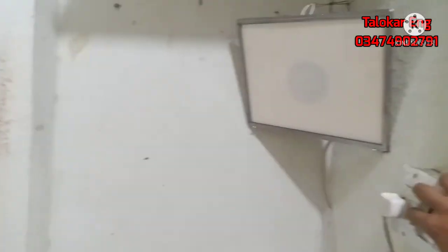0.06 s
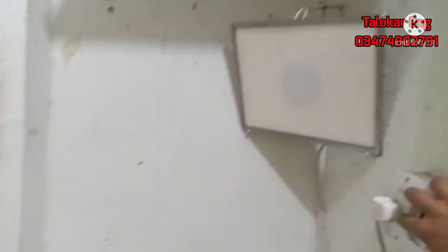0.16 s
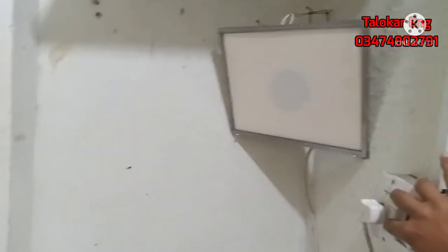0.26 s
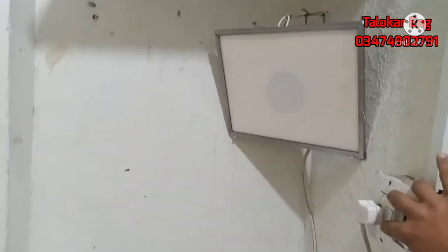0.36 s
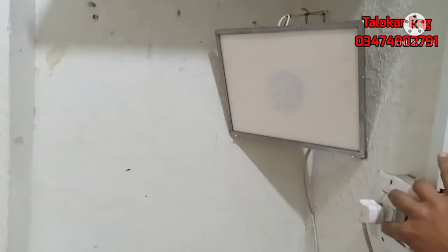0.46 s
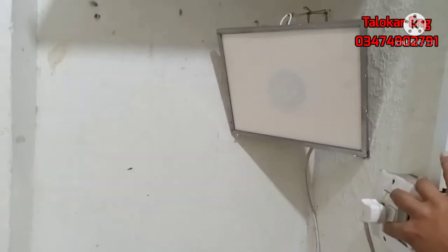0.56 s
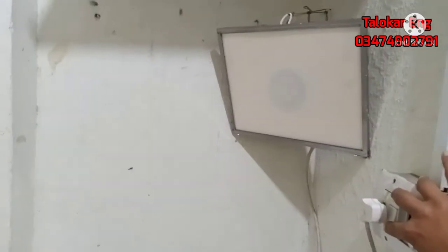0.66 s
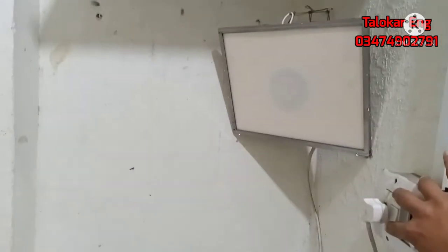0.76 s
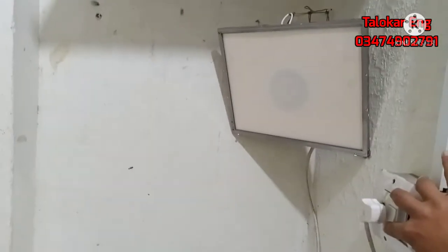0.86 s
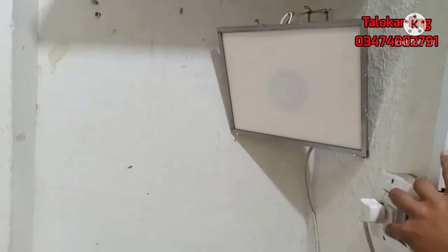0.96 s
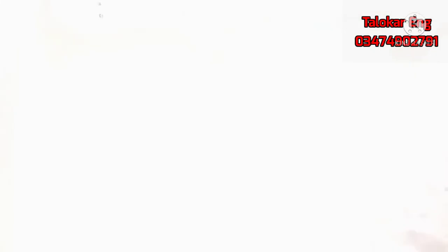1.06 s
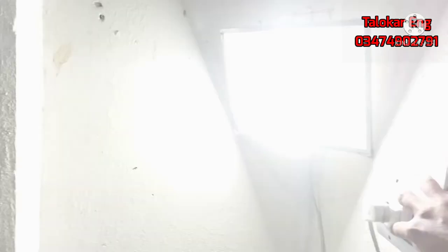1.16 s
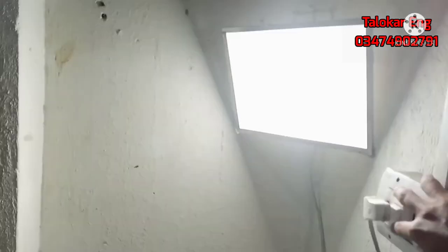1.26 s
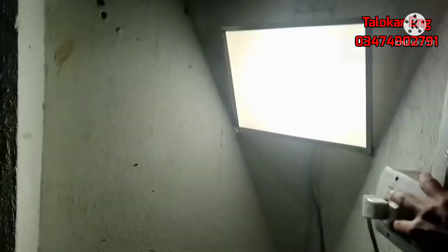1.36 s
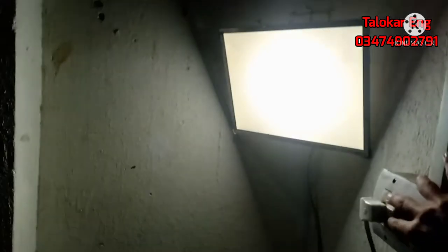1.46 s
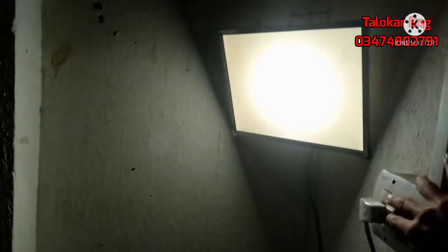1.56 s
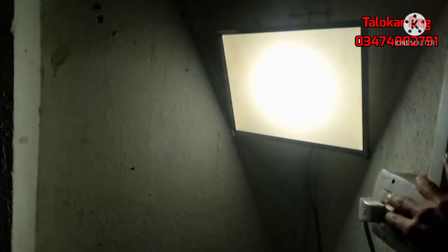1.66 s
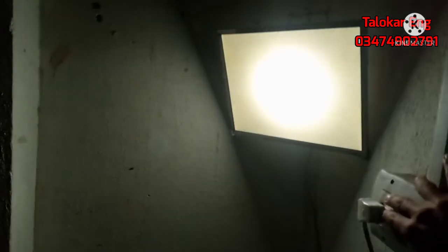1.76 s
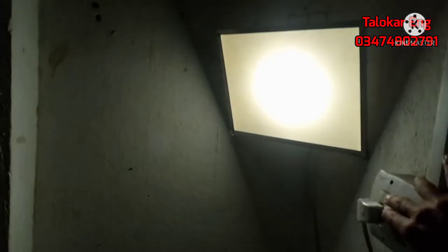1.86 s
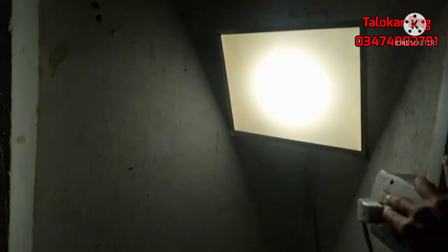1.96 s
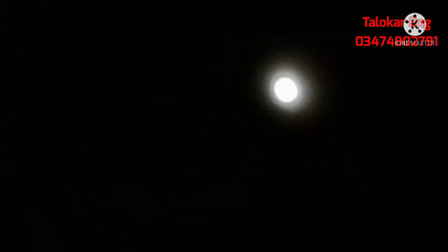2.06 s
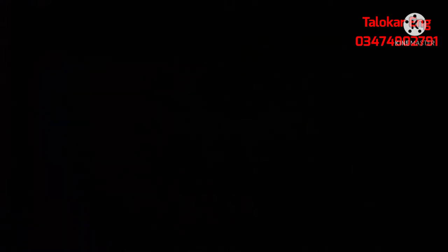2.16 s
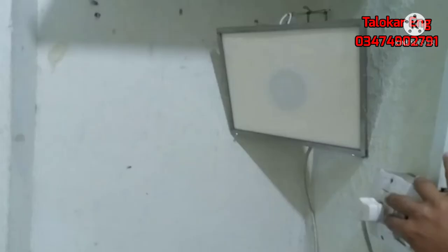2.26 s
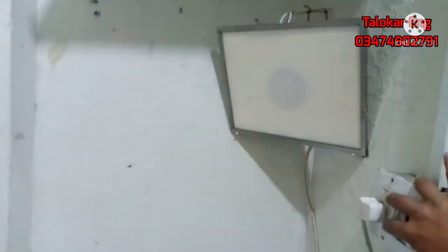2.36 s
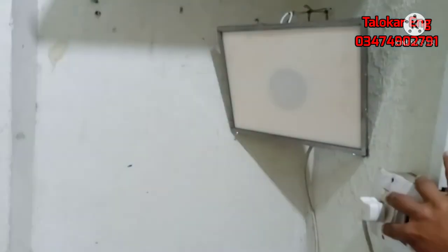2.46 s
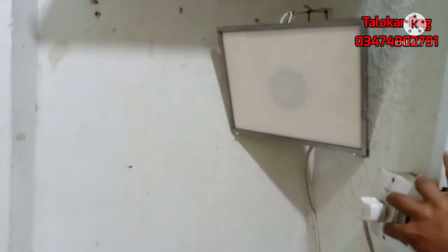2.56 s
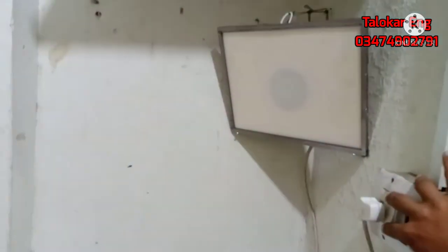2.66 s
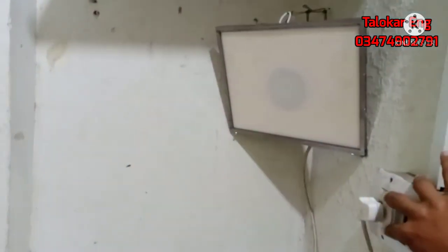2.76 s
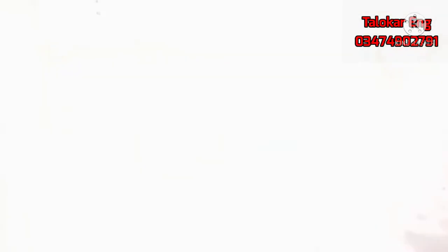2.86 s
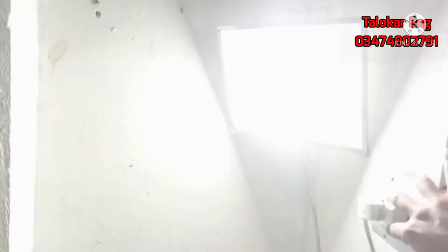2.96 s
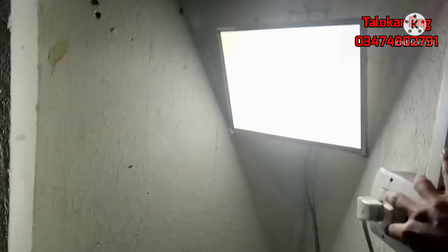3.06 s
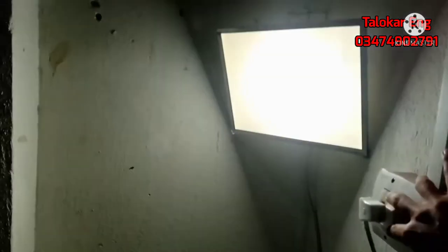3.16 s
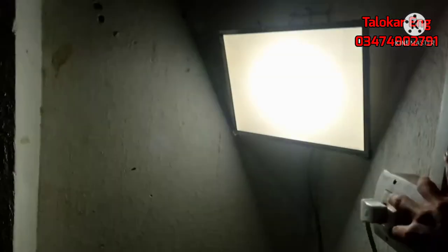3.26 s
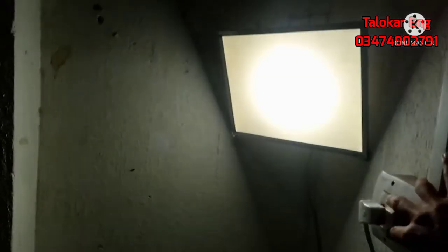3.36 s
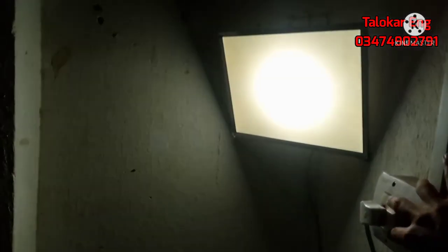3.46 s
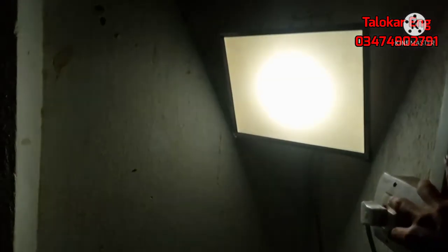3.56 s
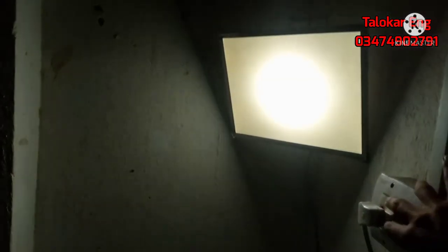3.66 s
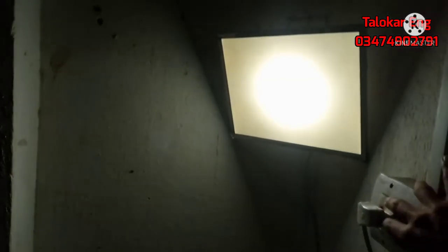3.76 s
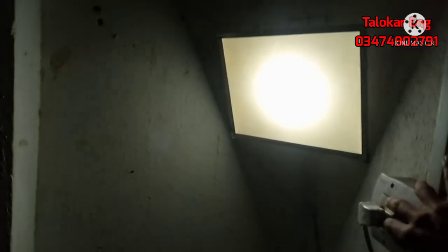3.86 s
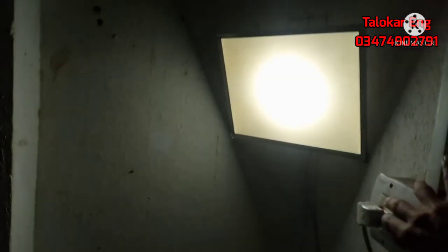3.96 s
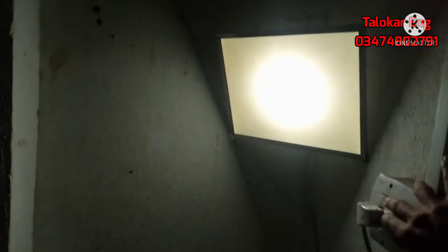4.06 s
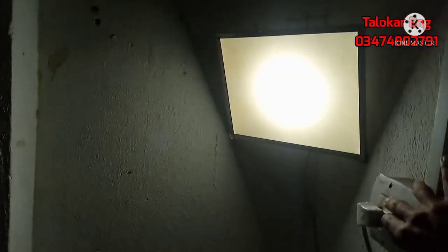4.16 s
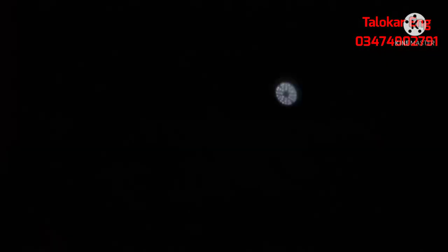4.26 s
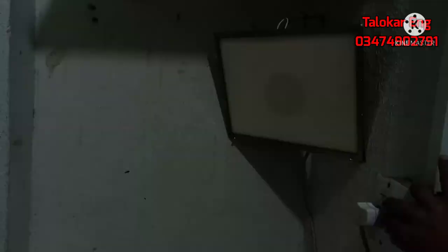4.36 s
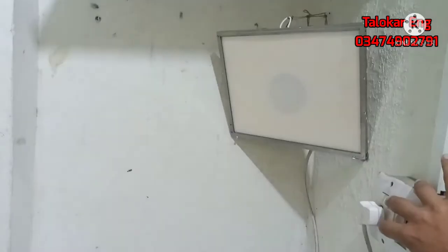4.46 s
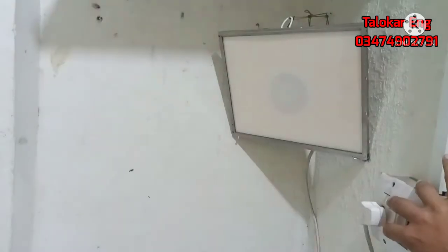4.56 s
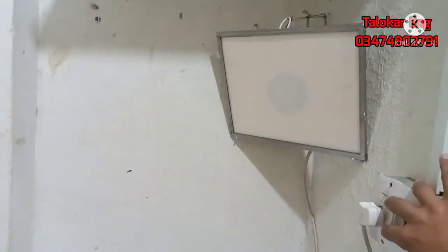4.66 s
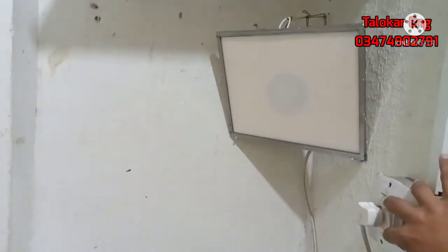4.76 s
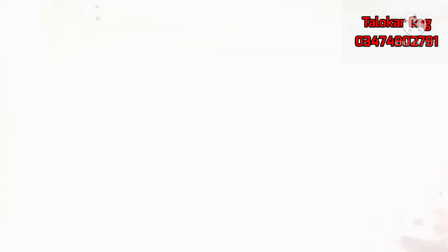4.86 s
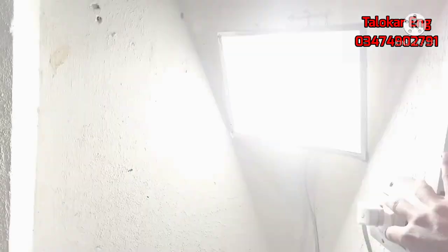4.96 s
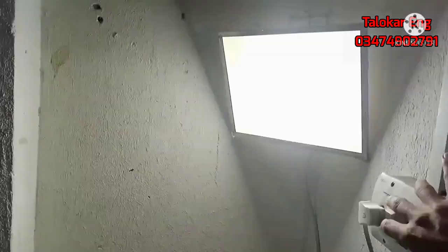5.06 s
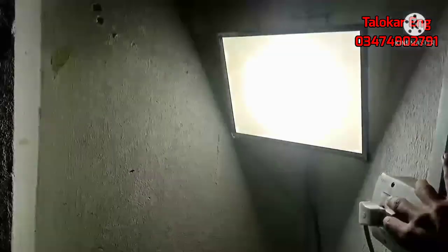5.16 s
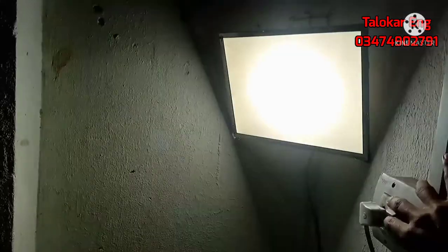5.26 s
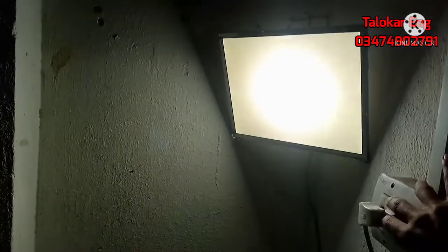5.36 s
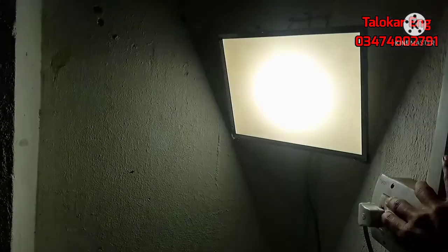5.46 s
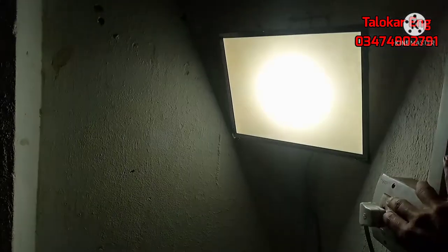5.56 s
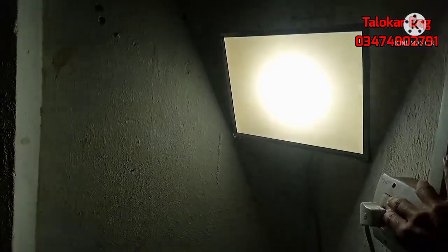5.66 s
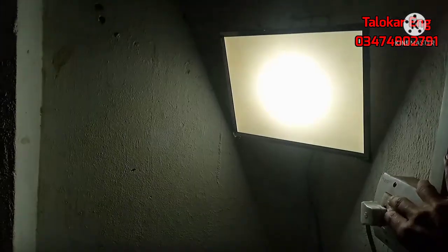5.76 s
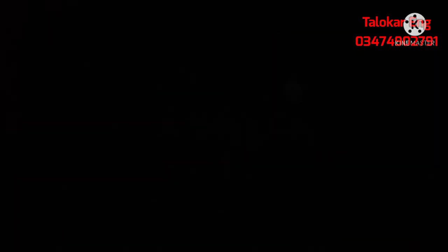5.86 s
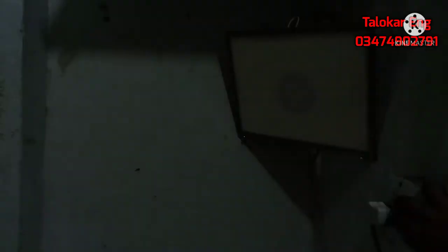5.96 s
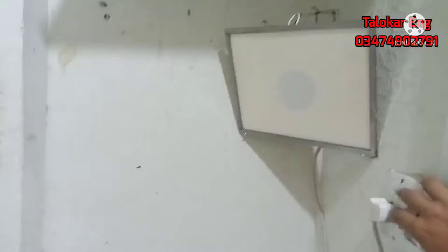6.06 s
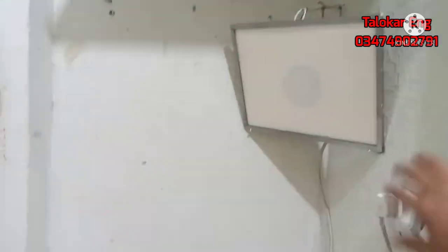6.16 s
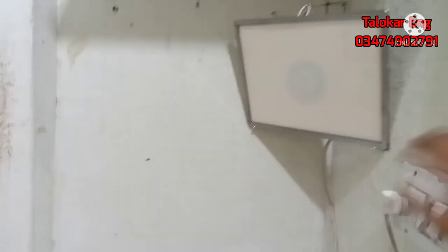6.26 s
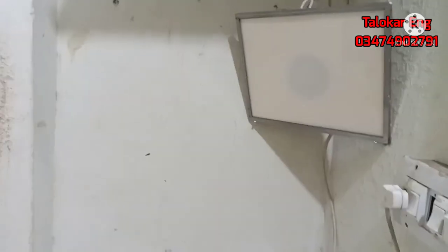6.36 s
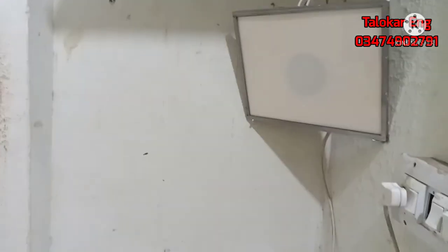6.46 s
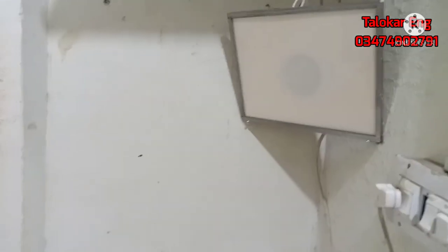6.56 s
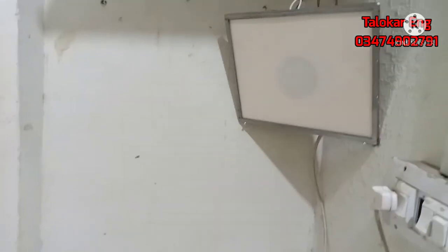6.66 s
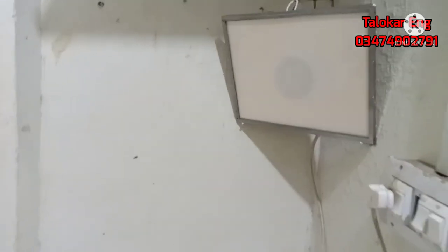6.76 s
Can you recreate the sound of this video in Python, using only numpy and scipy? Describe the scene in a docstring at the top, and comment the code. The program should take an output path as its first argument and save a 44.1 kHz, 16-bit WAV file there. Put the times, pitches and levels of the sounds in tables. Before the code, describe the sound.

Faint finger touches on a switch plate come first, then six crisp loud snaps, unevenly spaced in on-off pairs, each with tiny fast bounces and a short hard-walled echo. Light knocks fall between some of them. After the last snap, the hand leaves with a knock, skin scrape, brief squeak and soft cloth rustle. A phone microphone, close up, catches quiet room rumble, weak wavering hum and slight hiss.

```python
"""Wall switch, close, in a small bare room

A phone close to a plastic wall switch hears it flipped on and off three times, each flip ringing round the walls.
A flip is a shaped pulse with two bounces through narrow ringing peaks; the phone's limiter ducks and recovers.
Filtered pulses knock and tick on the plate; shaped noise makes sliding skin, a squeak and a rustling sleeve.
Narrow bands of noise give a low wavering hum and faint far tones, over quiet rumble and hiss."""
import sys
import numpy as np
from scipy import signal
from scipy.fft import rfft, irfft, next_fast_len
from scipy.io import wavfile
from scipy.ndimage import uniform_filter1d, minimum_filter1d, map_coordinates

SR = 44100
rng = np.random.default_rng(int(sys.argv[2]) if len(sys.argv) > 2 else 0)


def log_audio(samples):
    """Write samples as a 16-bit WAV file to the path given in sys.argv[1]."""
    # one column per channel
    frames = np.atleast_2d(samples).T
    # limit to full scale, then quantise
    limited = np.clip(frames, -1, 1)
    pcm = np.round(limited * 32767).astype(np.int16)
    wavfile.write(sys.argv[1], SR, pcm)


N = 299439

# flips of the rocker, on and off in turn, each with a resonance that the grip leaves free:
# (time [s], relative strength [dB], resonance [Hz], resonance level [dB])
ROCKER_FLIPS = [(1.1098, -8.5, 1733, -3), (2.1787, -6.5, 4495, -3), (2.9146, -8.5, 2020, -2.5),
                (4.3273, -6.5, 1210, 4), (4.9108, -8.5, 3590, -5), (5.9338, -7.5, 870, 2.5)]
# spectrum of the spring's blow against each end stop: (frequency [Hz], relative level [dB])
ON_BLOW_SPECTRUM = [(100, -45), (300, -23), (550, -7.5), (800, -6), (1200, -6.5), (1700, 0.5), (2700, -2.5),
                    (3600, 1.5), (5000, -2), (6500, -9.5), (9000, -5.5), (10200, -20.5), (13000, -21.5),
                    (15500, -19)]
OFF_BLOW_SPECTRUM = [(100, -46), (300, -30.5), (550, -4), (800, -7), (1300, -9.5), (2000, -2), (2900, 0),
                     (4800, -2), (5800, 0.5), (6800, -4), (9000, -3.5), (11000, -12), (13000, -15),
                     (15500, -6.5)]
# narrow ringing peaks that the room gives the on and off clicks, before they are widened:
# (frequency [Hz], width [Hz], relative level [dB])
ON_RING_PEAKS = [(1090, 24, -11.5), (1420, 19, -6.5), (1583, 56, -2.5), (2070, 130, -5), (2714, 95, -5.5),
                 (3437, 110, -1), (3890, 70, -5), (4290, 37, -9), (4660, 63, -9.5), (5227, 220, -9.5),
                 (5650, 37, -10.5), (6250, 140, -2.5), (6300, 15, -11), (8780, 47, -34.5)]
OFF_RING_PEAKS = [(883, 100, -3.5), (1340, 25, 0), (1560, 240, -0.5), (2170, 110, -11.5), (3410, 81, -6),
                  (4200, 19, -10.5), (4387, 76, -4.5), (5050, 11, 2.5), (5340, 130, 0), (5900, 620, -5.5),
                  (6430, 64, -10.5), (6740, 24, -8), (7700, 32, -12.5), (8950, 75, -10.5)]
# contact at each end stop: (time between bounces [s], bounce level [dB], widening of the peaks [Hz])
ON_STOP, OFF_STOP = (0.00115, -2.5, 8), (0.0011, -2, 16)

# fingers pressing and leaving the plate:
# (time [s], level [dB], thud of the board relative to the plate [dB])
FINGER_KNOCKS = [(0.125, -44.5, -21), (1.551, -39.5, -20), (1.633, -46, -7), (2.383, -34, -21),
                 (5.84, -43.5, -17.5), (6.219, -33, -15), (6.232, -24.5, -6)]
# lower resonances of the switch board: (frequency [Hz], width [Hz], relative level [dB])
BOARD_MODES = [(130, 45, -6), (257, 59, 4), (466, 170, 4.5), (867, 160, 15)]
# the plate's ring under a finger
KNOCK_HZ, KNOCK_WIDTH_HZ = 1286, 446
# ticks of a nail on plastic: (time [s], relative level [dB])
NAIL_TICKS = [(0.212, -43), (0.319, -45), (0.417, -45), (0.645, -48), (1.038, -45), (2.384, -39),
              (6.22, -30)]
# spectrum of a nail's tick: (frequency [Hz], relative level [dB])
NAIL_SPECTRUM = [(500, -29.5), (2000, -1.5), (4500, -6), (6800, 12), (9000, -4.5), (12000, -4.5),
                 (15500, -8)]

# fingers sliding on the plate: (start [s], length before release [s], level [dB])
FINGER_SLIDES = [(0.074, 0.14, -72.5), (0.207, 0.2, -69.5), (6.151, 0.17, -62), (6.34, 0.1, -57.5)]
SLIDE_ATTACK_S, SLIDE_RELEASE_S = 0.004, 0.028
# spectrum of skin sliding on the plate: (frequency [Hz], relative level [dB])
SKIN_SPECTRUM = [(400, -10), (1000, -19), (2800, -3), (4500, 0), (6800, 7.5), (8500, 3), (11000, -8),
                 (15500, -12)]
# one squeak of a fingertip slipping off the rocker: (start [s], mean frequency [Hz], level [dB])
FINGERTIP_SQUEAK = (6.186, 985, -47)

# the arm reaching in and withdrawing: (time at full speed [s], length [s], rustle level [dB])
ARM_SWEEPS = [(0.01, 0.17, -60.5), (6.539, 0.62, -49.5)]
# spectrum of a rustling sleeve: (frequency [Hz], relative level [dB])
CLOTH_SPECTRUM = [(50, -12), (110, 11), (200, 2), (300, 9), (400, 7), (700, -5.5), (1100, 5), (1600, 6.5),
                  (3000, 4.5), (5000, 5.5), (7000, 8.5), (9000, 2), (12000, -9.5), (15500, -9)]

# faint thin tones from far off: (time at the middle [s], frequency [Hz], level [dB])
FAR_TONES = [(3.73, 1430, -75), (3.87, 3590, -79), (3.95, 2330, -75)]
TONE_S, TONE_WIDTH_HZ = 0.18, 114
# bands of the hum: (frequency [Hz], width [Hz], level [dB])
HUM_BANDS = [(65.6, 7, -62.5), (112.53, 15, -58.5), (202.4, 33, -65.5)]
# spectrum of the quiet room's rumble and hiss: (frequency [Hz], relative level [dB])
AIR_SPECTRUM = [(20, -21), (45, -16), (60, -0.5), (90, -2), (150, -5), (220, -14), (280, -17.5),
                (400, -24.5), (800, -30), (2000, -36), (5000, -41), (15500, -46.5)]

# reverberation of the small bare room: (frequency [Hz], time to fall 60 dB [s])
ROOM_DECAY = [(150, 0.6), (500, 0.38), (1000, 0.28), (2000, 0.35), (4000, 0.31), (6500, 0.29), (9000, 0.25),
              (12000, 0.26), (15500, 0.16)]
# the phone's microphone, a treble shelf and a port resonance: (frequency [Hz], level [dB])
MIC_RESPONSE = [(6900, -0.5), (7700, -8), (13600, -12.5), (14400, -2), (15100, 3.5), (15600, -8.5)]
TOP_HZ = 15750  # nothing passes above this


def switch(room, level_db=19, ring_db=7, grip_width_hz=160, wet_db=0.07, bounce_feed=0.45):
    """The spring throws the rocker at each stop in turn; it bounces twice and the click rings in the room."""
    out = np.zeros(N)
    positions = [
        (ON_BLOW_SPECTRUM, ON_RING_PEAKS, ON_STOP),
        (OFF_BLOW_SPECTRUM, OFF_RING_PEAKS, OFF_STOP),
    ]
    for flip, (s, db, grip_hz, grip_db) in enumerate(ROCKER_FLIPS):
        blow, peaks, (bounce_s, bounce_db, widening_hz) = positions[flip % 2]
        grip_mode = [(grip_hz, grip_width_hz, grip_db)]

        def ring_and_grip(f):
            ring = 1 + amp(ring_db) * resonances(peaks, f, widening_hz)
            return ring * (1 + resonances(grip_mode, f))

        snap = filtered(impulse(blow), ring_and_grip)
        snap = amp(level_db + db) * snap / np.linalg.norm(snap)
        bounces = np.zeros(len(snap))
        for k in (1, 2):
            add(bounces, k * bounce_s, amp(bounce_db) * scuffed(snap, size=32))
        add(out, s, snap + bounces)
        # the echoes follow mostly the first blow, with the bounces fainter, so the tail stays smooth
        add(out, s, amp(wet_db) * echoes(snap + bounce_feed * bounces, room))
    return out


def fingers(room, treble_db=-17, knock_wet_db=-3.5, tick_db=1, tick_wet_db=-3):
    """Soft knocks ring the plate and thud in the board behind it; nails add bright ticks."""
    out = np.zeros(N)
    pad = impulse([(100, -26), (350, 7.5), (1400, -4), (2500, 0), (5000, 0), (15000, -66)])
    tick = impulse(NAIL_SPECTRUM)
    tick = tick / abs(tick).max()
    for s, db, thud_db in FINGER_KNOCKS:

        def plate_and_board(f):
            plate = resonances([(KNOCK_HZ, KNOCK_WIDTH_HZ, 2)], f) ** 2
            return plate + amp(thud_db) * resonances(BOARD_MODES, f)

        knock = filtered(pad, plate_and_board)
        knock = knock / abs(knock).max()
        add(knock, 0, amp(treble_db) * scuffed(tick, size=128))
        add(out, s, amp(db) * knock)
        add(out, s, amp(db + knock_wet_db) * echoes(knock, room))
    for s, db in NAIL_TICKS:
        add(out, s, amp(db + tick_db) * scuffed(tick, size=40))
        add(out, s, amp(db + tick_db + tick_wet_db) * echoes(tick, room))
    return out


def skin(catch_rate=80, catch_db=-3, patch_db=2.0):
    """Skin hisses over the plate and catches at random, catch_rate times a second on average."""
    pressure = sum(amp(db) * stroke(s, length, SLIDE_ATTACK_S, SLIDE_RELEASE_S)
                   for s, length, db in FINGER_SLIDES)
    hiss = patchy(noise(lambda f: amp(along(SKIN_SPECTRUM, f))), patch_db)
    catches = (rng.random(N) < catch_rate / SR) * rng.standard_normal(N)
    # a catch is a tiny, thin nail tick, tilted towards the treble
    thin_tick = np.diff(impulse(NAIL_SPECTRUM))
    ticks = unit(signal.fftconvolve(catches, thin_tick)[:N])
    return pressure * (hiss + amp(catch_db) * ticks)


def squeak(length_s=0.012, attack_s=0.0023, release_s=0.016, jitter=0.048, jitter_rate=600, rasp_db=-7):
    """Skin sticks and slips for a moment: an unsteady tone with a bright rasp once a cycle."""
    s, hz, db = FINGERTIP_SQUEAK
    unsteady_hz = hz * (1 + jitter * wobble(jitter_rate))
    phase = 2 * np.pi * np.cumsum(unsteady_hz) / SR
    hiss = noise(lambda f: amp(along(SKIN_SPECTRUM, f)))
    rasp = unit(hiss * (1 + np.cos(phase)) ** 2)
    tone = unit(np.sin(phase))
    return amp(db) * stroke(s, length_s, attack_s, release_s) * (tone + amp(rasp_db) * rasp)


def sleeve(grain_db=1.0, grain_rate=90, patch_db=1.6,
           rumble_db=-3, rumble_hz=112, rumble_width_hz=25, rumble_lead_s=0.14):
    """Cloth rustles in step with the arm's speed; a low rumble runs ahead of it."""
    def speed(lead_s):
        return sum(amp(db) * swell(s - lead_s, length) for s, length, db in ARM_SWEEPS)

    cloth = patchy(noise(lambda f: amp(along(CLOTH_SPECTRUM, f))), patch_db)
    grain = unit(amp(grain_db * wobble(grain_rate)))
    rustle = speed(0) * grain * cloth
    rumble = amp(rumble_db) * speed(rumble_lead_s) * narrow(rumble_hz, rumble_width_hz)
    return rustle + rumble


def thin_tones():
    """Narrow bands of noise from far off, each swelling and fading once."""
    return sum(amp(db) * swell(s, TONE_S) * narrow(hz, TONE_WIDTH_HZ) for s, hz, db in FAR_TONES)


def background(air_db=-58, patch_db=2.0, swell_db=0.5, swell_rate=6):
    """Faint hiss and low rumble, with a hum that wavers in narrow bands."""
    hum = sum(amp(db) * narrow(hz, width) for hz, width, db in HUM_BANDS)
    air = patchy(noise(lambda f: amp(along(AIR_SPECTRUM, f))), patch_db)
    return hum * amp(swell_db * wobble(swell_rate)) + amp(air_db) * air


def reflections(near_db=-1, near_s=0.002, far_db=1, build_s=0.005):
    """Quick dense echoes from the corner round the switch, then the diffuse tail of the room."""
    hz, frame_s, z = signal.stft(rng.standard_normal(SR * 2 // 3), SR, nperseg=256)
    decay_db = -60 * frame_s / along(ROOM_DECAY, hz)[:, None]
    tail = signal.istft(z * amp(decay_db), SR, nperseg=256)[1]
    t = np.arange(len(tail)) / SR
    tail = tail * (1 - np.exp(-(t / build_s) ** 2))
    corner = rng.standard_normal(len(t)) * (t / near_s) * np.exp(-t / near_s)
    return amp(near_db) * corner / np.linalg.norm(corner) + amp(far_db) * tail / np.linalg.norm(tail)


def echoes(sound, room, kept=0.48):
    """The room's answer: part stays the same, part shifts as the hand moves."""
    # kept is a share of the energy
    response = np.sqrt(kept) * room + np.sqrt(1 - kept) * reflections()
    return signal.fftconvolve(sound, response)


def resonances(modes, f, widening_hz=0):
    """Summed response of modes (Hz, width Hz, dB), each widened by extra damping."""
    total = 0
    for centre, width, db in modes:
        loss = 1j * f * (width + widening_hz)
        total = total + amp(db) * loss / (centre * centre - f * f + loss)
    return total


def impulse(spectrum, size=4096):
    """The sharpest causal (minimum-phase) pulse with this spectrum, by folding its cepstrum."""
    hz = np.fft.rfftfreq(size, 1 / SR)
    cepstrum = irfft(np.log(amp(along(spectrum, hz))))
    cepstrum[1:size // 2] *= 2
    cepstrum[size // 2 + 1:] = 0
    return irfft(np.exp(rfft(cepstrum)))


def scuffed(sound, size):
    """A contact spread over size samples, with a random colour of its own."""
    scrape = rng.standard_normal(size)
    return np.convolve(sound, scrape / np.linalg.norm(scrape))


def patchy(x, depth_db):
    """Random swells and gaps, each a few hundred hertz wide and a few tens of milliseconds long."""
    z = signal.stft(x, nperseg=512)[2]
    field = uniform_filter1d(rng.standard_normal(z.shape), size=5, axis=0)
    field = uniform_filter1d(field, size=7, axis=1)
    return unit(signal.istft(z * amp(depth_db * unit(field)), nperseg=512)[1][:N])


def noise(response):
    """Coloured noise of rms 1."""
    return unit(filtered(rng.standard_normal(N), response))


def narrow(hz, width):
    """A wavering tone of rms 1: a narrow band of noise."""
    return noise(lambda f: 1 / (1 + (2 * (f - hz) / width) ** 4))


def wobble(rate):
    """A smooth random curve, rate knots a second."""
    knots = rng.standard_normal(int(N * rate / SR) + 4)
    return map_coordinates(knots, [np.arange(N) * rate / SR])


def stroke(s, length_s, attack_s, release_s):
    """An envelope that rises at time s, holds and dies away."""
    t = np.maximum(np.arange(N) / SR - s, 0)
    return (1 - np.exp(-t / attack_s)) * np.exp(-np.maximum(t - length_s, 0) / release_s)


def swell(s, length_s):
    """A smooth arch from rest to rest, highest at time s."""
    return np.cos(np.pi * np.clip((np.arange(N) / SR - s) / length_s, -.5, .5))


def filtered(x, response):
    """x times a response of frequency."""
    m = next_fast_len(len(x) + SR // 4)  # padded so that ringing dies away
    return irfft(rfft(x, m) * response(np.fft.rfftfreq(m, 1 / SR)), m)[:len(x)]


def along(points, hz):
    """(Hz, value) points read on a log axis."""
    f, v = np.transpose(points)
    return np.interp(np.log(hz + 1), np.log(f + 1), v)


def amp(db):
    """Decibels to gain."""
    return 10 ** (np.asarray(db) / 20)


def unit(x):
    """Scale to rms 1."""
    return x / np.sqrt(np.mean(x ** 2) + 1e-20)


def add(track, s, sound):
    """Mix a sound into the track at time s."""
    part = track[max(round(s * SR), 0):][:len(sound)]
    part += sound[:len(part)]


def scene():
    """Everything that reaches the phone."""
    room = reflections()
    hand = fingers(room) + skin() + squeak() + sleeve()
    return (switch(room) + hand + thin_tones() + background())[None]


def limiter(x, ceiling_db, release_db_per_s, size=220):
    """The gain drops just ahead of a loud sound and climbs back at a steady rate in dB."""
    level_db = 10 * np.log10(abs(uniform_filter1d(x ** 2, size)) + 1e-12)
    needed_db = minimum_filter1d(np.minimum(ceiling_db - level_db, 0), 2 * size)
    climb_db = release_db_per_s * np.arange(N) / SR
    gain_db = np.minimum.accumulate(needed_db - climb_db) + climb_db
    return x * amp(uniform_filter1d(gain_db, size))


def record(dry):
    """The phone's microphone colours the treble, its limiter holds the snaps, and the top is cut off."""
    coloured = filtered(dry[0], lambda f: amp(along(MIC_RESPONSE, f)))
    limited = limiter(coloured, ceiling_db=-17.5, release_db_per_s=126)
    return filtered(limited, lambda f: f < TOP_HZ)[None]


dry = scene()
out = record(dry)
log_audio(out)
```